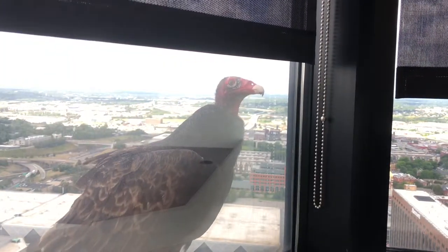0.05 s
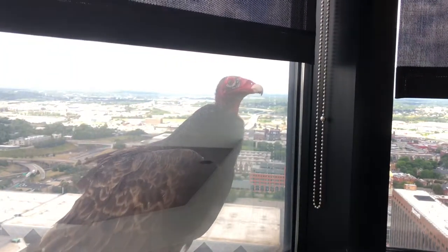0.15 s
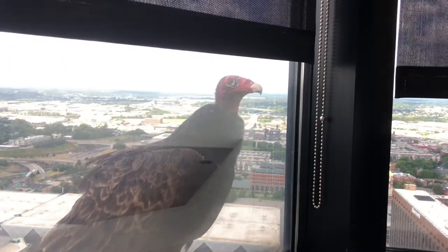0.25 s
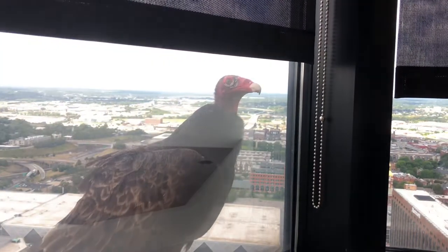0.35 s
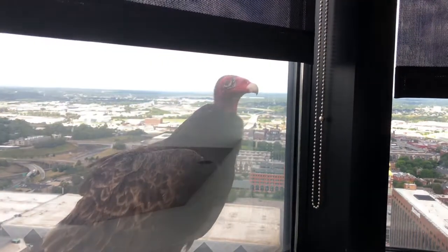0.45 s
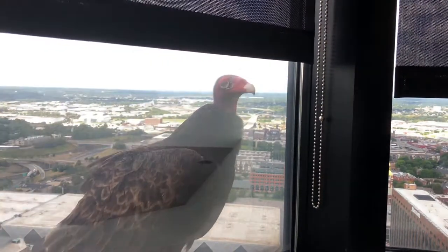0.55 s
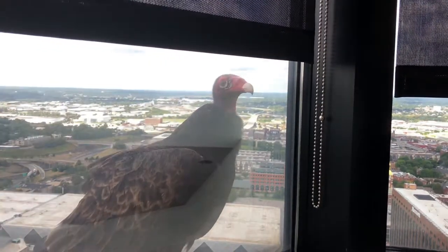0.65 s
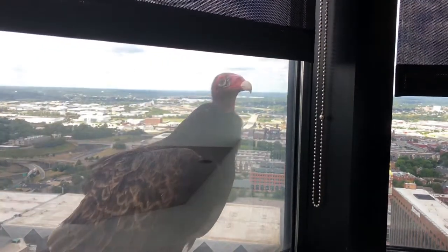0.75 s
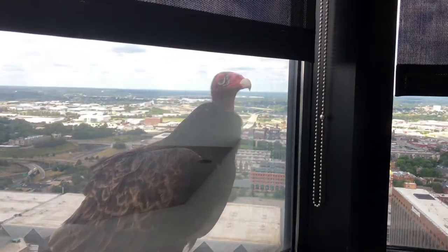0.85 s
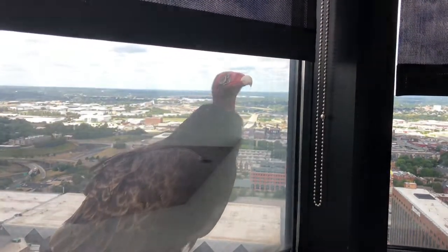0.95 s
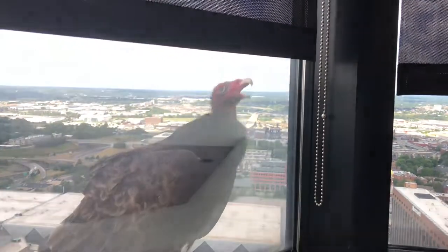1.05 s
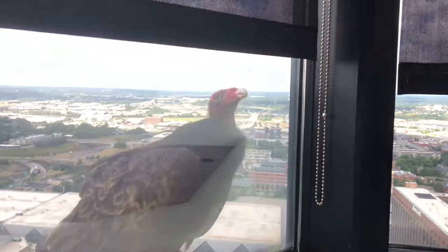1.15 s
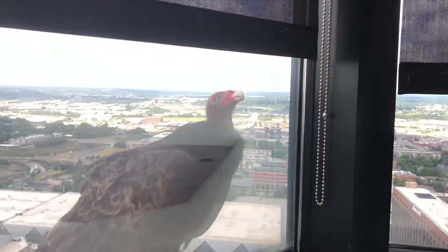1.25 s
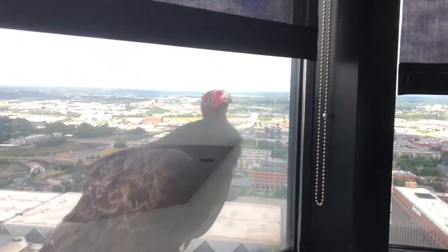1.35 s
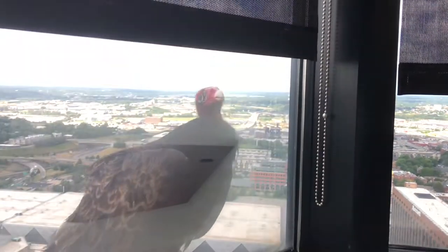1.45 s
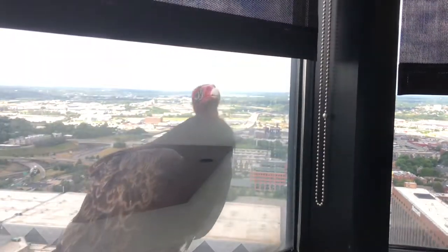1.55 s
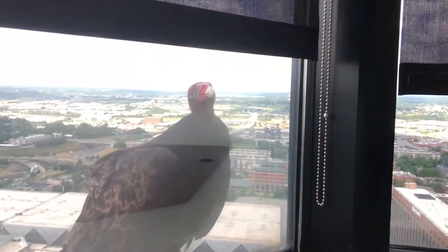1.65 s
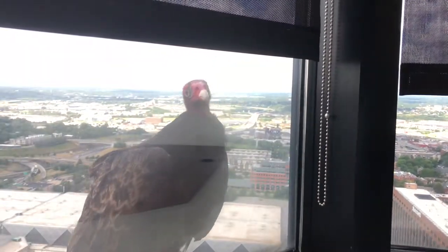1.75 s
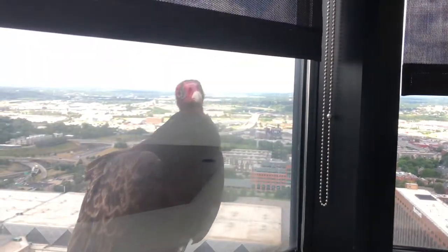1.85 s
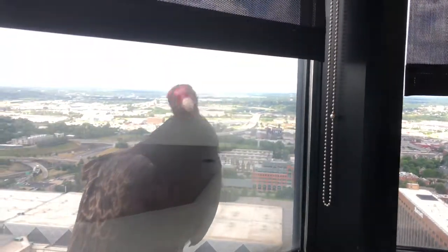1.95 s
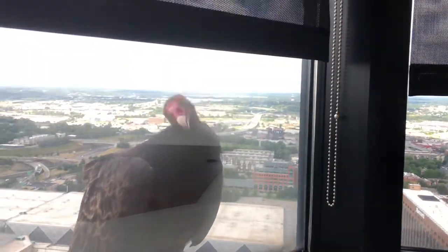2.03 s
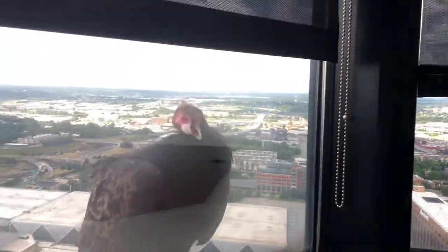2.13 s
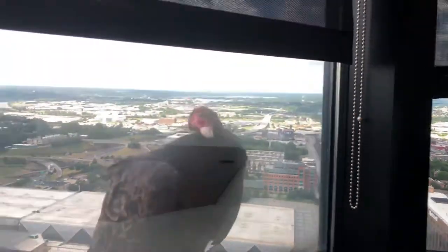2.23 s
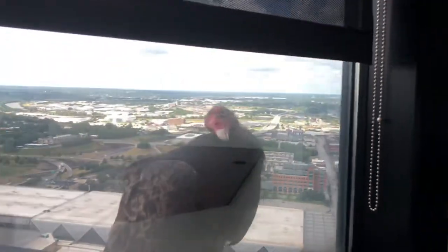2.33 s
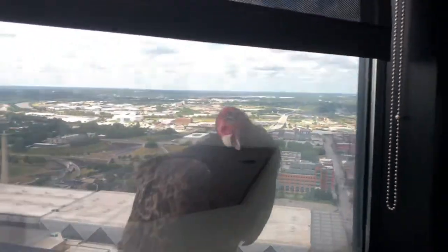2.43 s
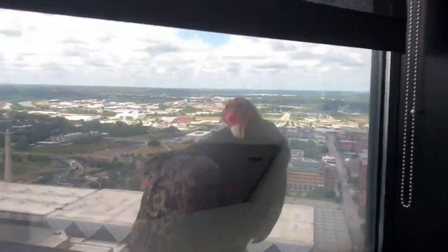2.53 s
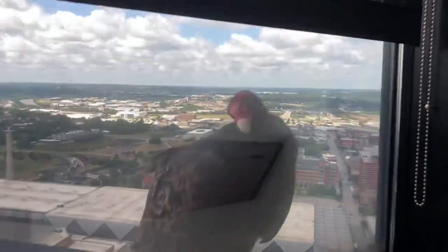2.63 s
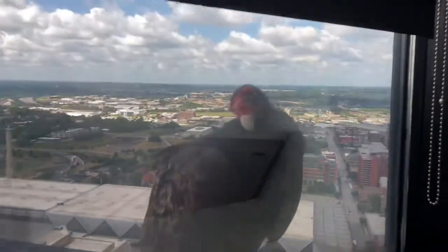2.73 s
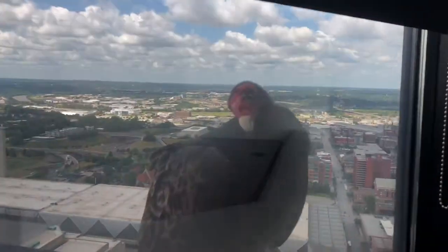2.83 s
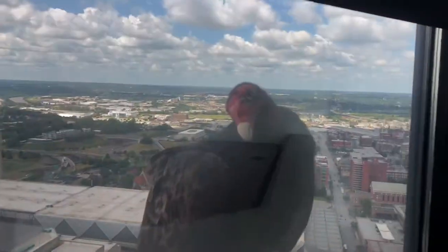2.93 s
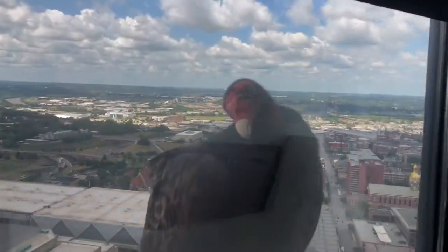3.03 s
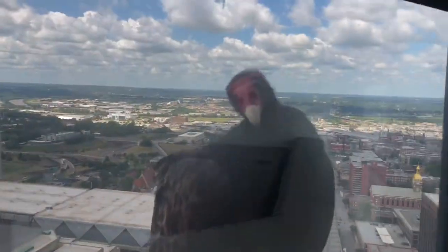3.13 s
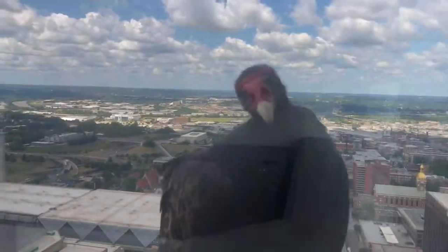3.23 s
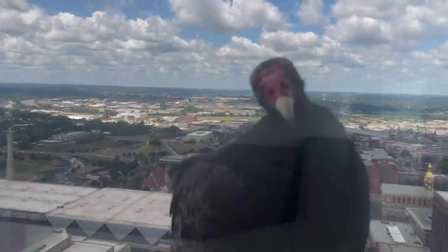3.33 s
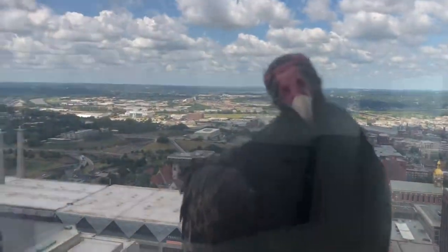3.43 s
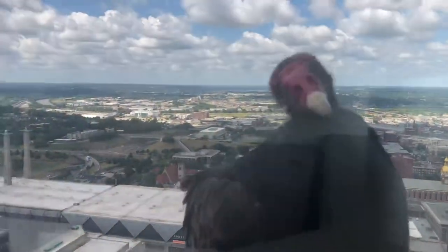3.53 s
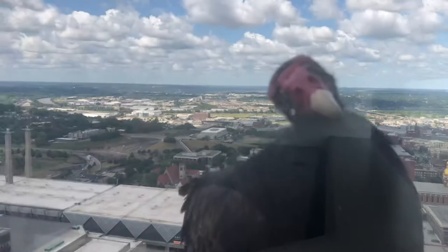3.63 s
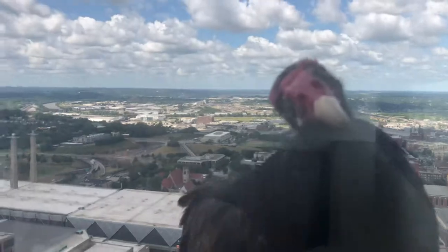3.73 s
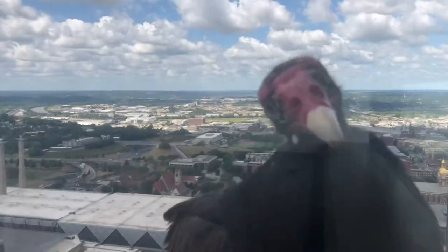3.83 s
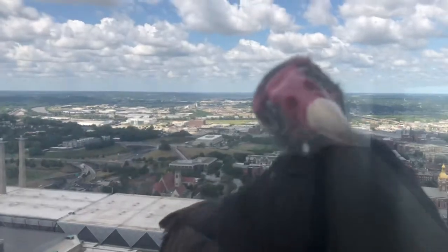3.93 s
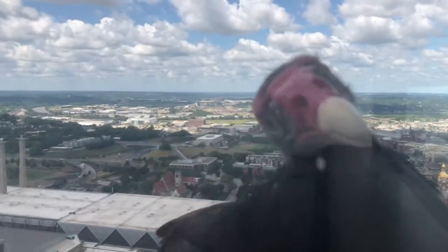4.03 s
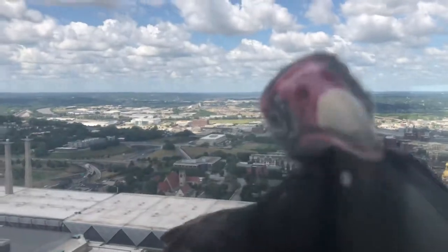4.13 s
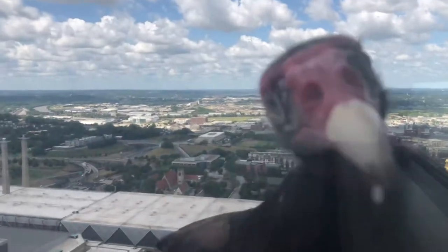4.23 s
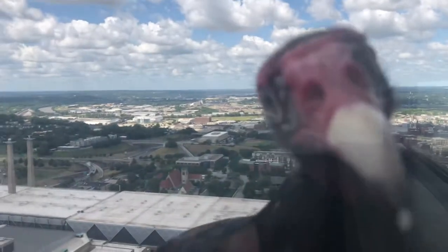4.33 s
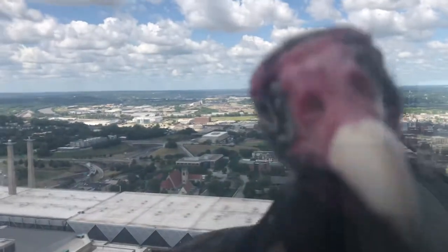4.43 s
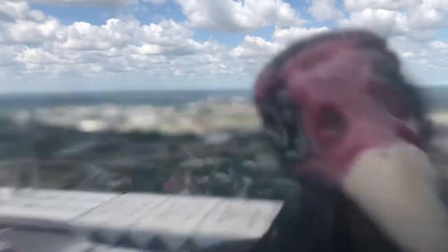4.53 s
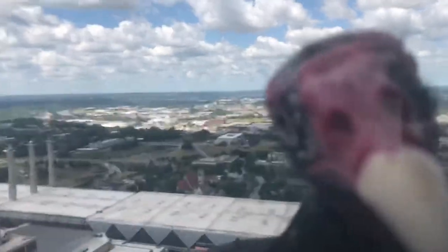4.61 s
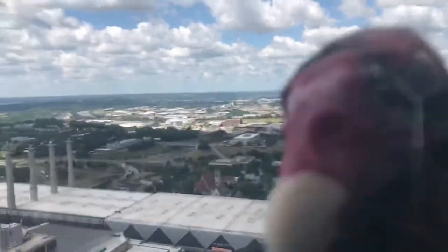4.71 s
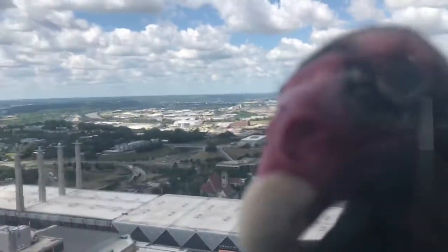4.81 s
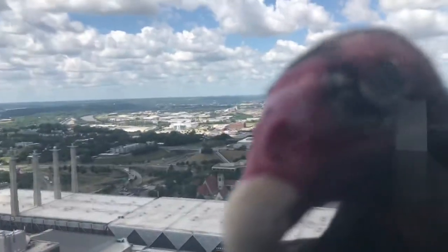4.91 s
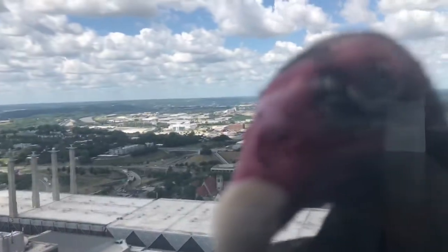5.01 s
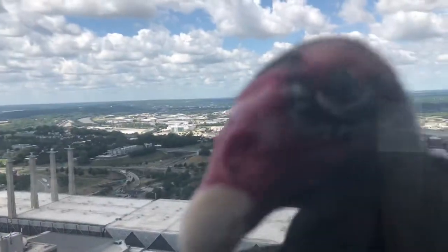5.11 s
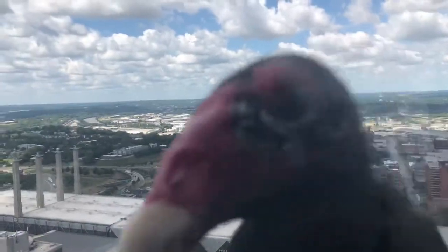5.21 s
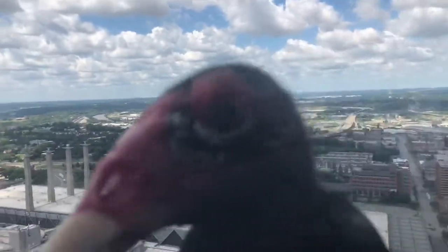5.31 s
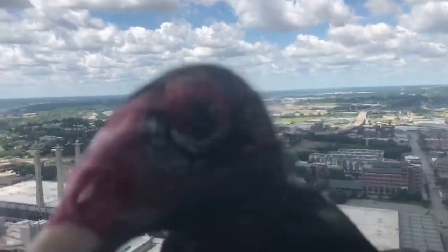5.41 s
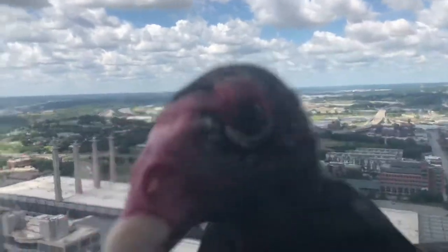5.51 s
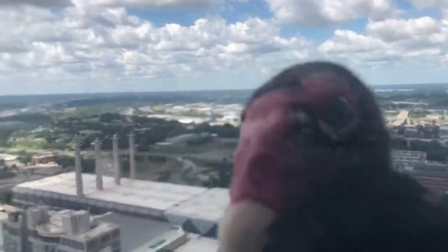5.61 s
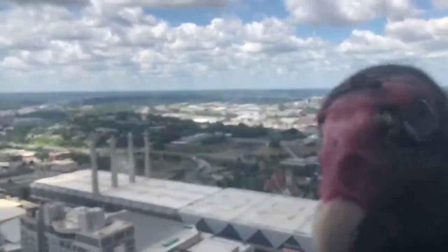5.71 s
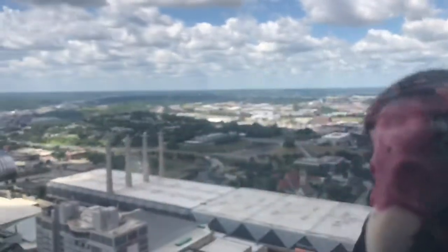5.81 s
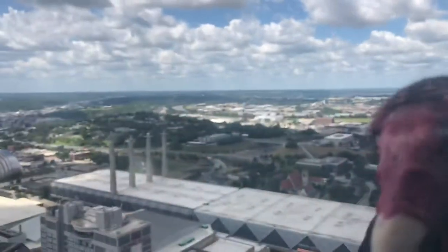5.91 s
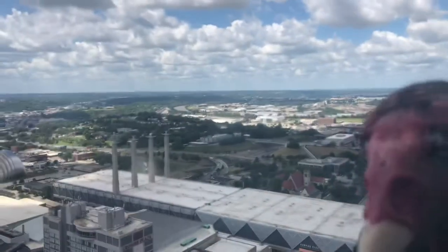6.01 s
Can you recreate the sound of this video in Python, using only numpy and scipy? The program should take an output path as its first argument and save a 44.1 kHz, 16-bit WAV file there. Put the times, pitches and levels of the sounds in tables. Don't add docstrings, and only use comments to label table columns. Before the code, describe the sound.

A low, soft ventilation rumble fills a room, with airy noise, a faint wavering fan hum near 138 Hz and a barely audible lens-drive hiss switching on and off. At 1.1 s come two or three quick, dull beak blows through the window frame. From 1.8 s small taps gather, with clearer ones near 2.1, 2.35 and 2.5 s, a gritty claw or feather drag, and short room echoes. Around 3 s there is a scratch and faint squeak, then light irregular pecks until 4.2 s as the microphone nears the pane and the air grows fuller. A sharper tap with a rising squeak at 4.46 s leads to a huge knock at 4.62 s: a bright crack dropping instantly to a thump, overloaded, with a tiny rattle. The background dips briefly. A weaker knock follows at 4.75 s, small taps and scrapes at 4.95 and 5.4 s, and a last faint tap at 5.8 s; the hum continues to 6 s.

```python
import sys
import numpy as np
from scipy import signal
from scipy.fft import rfft, irfft
from scipy.io import wavfile
from scipy.ndimage import uniform_filter1d

SR = 44100
rng = np.random.default_rng(int(sys.argv[2]) if len(sys.argv) > 2 else 0)


def boost(x):
    u = np.asarray(x, float) / 20
    return 10 ** u


def output_pcm(signal):
    pcm = np.clip(np.atleast_2d(signal).T, -1, 1) * 32767
    wavfile.write(sys.argv[1], SR, np.round(pcm).astype(np.int16))


N = 267246

# t/s, nearness/1, fan tone level/dB
WALK = [
    (0, 0.18, -58),
    (1.9, 0.25, -53.5),
    (2.8, 0.54, -50.5),
    (3.8, 0.87, -55.5),
    (4.2, 0.8, -45),
    (4.8, 0.97, -49.5),
    (5.0, 0.87, -65),
    (5.2, 0.9, -43),
    (5.6, .8, -45.5),
    (6.06, .8, -48.5),
]
# f/Hz, density level/dB
RUMBLE_SPECTRUM = [(15, -58), (25, -34.5), (60, -16), (120, -10.5), (200, -14), (300, -18), (600, -26),
                   (1000, -40.5)]
# f/Hz, density level/dB
AIR_SPECTRUM = [(25, -28.5), (256, -11), (451, -18.5), (560, -26), (988, -35), (2280, -50), (2760, -56),
                (16000, -72.5)]
# f/Hz, width/Hz, level/dB
ROOM_MODES = [(85, 11, -2), (182.7, 17, 5.5), (207, 11, 5), (236.5, 7.5, 2), (292, 7.5, 4.5), (361, 5.7, 0),
              (454, 3.4, 0.5), (565, 20, -2)]
# f/Hz, level/dB
WHINE = (15240, -91)
# on t/s, off t/s
DRIVE_RUNS = [(0.073, 0.914), (1.783, 2.009), (2.017, 2.812), (2.985, 3.063), (3.318, 3.385),
              (3.455, 3.599), (3.69, 3.76), (3.815, 3.96), (4.09, 4.172), (4.204, 4.435), (4.51, 4.596),
              (4.956, 4.995), (5.061, 5.247), (5.419, 5.694), (6.035, 6.101)]
# f/Hz, density level/dB
DRIVE_SPECTRUM = [(880, -36.5), (1500, -2), (2060, -4), (3730, -3), (5380, -5), (15100, -11.5),
                  (16000, -11.5)]
# t/s, peak level/dB, ring f/Hz, relative thud level/dB
DULL_BLOWS = [(1.094, -35.5, 1250, 11), (1.134, -43.5, 905, 10.5), (1.164, -57.5, 926, 27.5),
              (1.839, -57, 840, 13.5), (1.988, -50.5, 950, 11.5), (2.121, -37.5, 1790, 9.5),
              (2.957, -41.5, 1460, 2.5), (3.346, -52, 830, 9.5), (4.46, -34, 1280, -4),
              (4.919, -43.5, 1420, 7.3), (5.386, -51.5, 1390, 10.5), (5.804, -58, 802, 6)]
# t/s, peak level/dB, ring f/Hz, relative thud level/dB
CRISP_TAPS = [(2.533, -33, 2160, 6.5), (3.096, -55.5, 860, -2), (3.467, -46.5, 790, 4),
              (3.542, -47, 1060, -23), (3.626, -44, 2160, 10), (5.424, -44.5, 1550, -7)]
# t/s, peak level/dB, ring f/Hz, relative thud level/dB, relative tick level/dB
CLOSE_TAPS = [(2.25, -44.5, 850, 10.5, -10), (2.307, -45.5, 1280, 7.5, -4), (2.359, -33, 1500, -9.5, -13),
              (3.01, -46, 1480, -32, -5), (3.375, -47, 940, 4, -2.5), (3.687, -45, 1560, 8.5, 9.5),
              (3.813, -36, 1790, 7.5, 3), (3.938, -45.5, 2340, 9, -6.5), (4.118, -41.5, 800, 10.5, 2),
              (4.206, -57.5, 2370, 0, 14.5), (4.514, -44, 2367, -6.5, -3), (4.592, -35, 800, 11, -6),
              (4.6166, -15, 748, 2.2, -2.5), (4.7506, -27, 937, 1, -0.5), (4.955, -42, 1570, -2, -11)]
# f/Hz, width/Hz, level/dB (not used)
PANE_MODES = [(389, 16, 0), (705, 27, -1), (1280, 25, -13), (1570, 11, -11), (1690, 15, -13),
              (2230, 120, -15), (2390, 47, -15), (2750, 28, -17), (3060, 38, -17), (4360, 72, -18),
              (5340, 26, -18), (5200, 22, -19)]
# t/s, level/dB, f/Hz, length/s
RINGS = [(1.827, -69, 800, 0.026), (1.981, -60, 1080, .05), (2.352, -58, 1660, .04),
         (2.533, -47, 2000, 0.012), (3.341, -59.5, 870, 0.026), (3.529, -64, 1090, 0.013),
         (3.62, -75, 2330, .02), (3.818, -47.5, 763, 0.033), (3.94, -83, 2400, .03),
         (4.205, -67, 2450, 0.038), (4.468, -63, 3270, 0.026), (4.511, -61, 2460, 0.044),
         (4.663, -48, 4776, .015), (4.771, -46.5, 4940, 0.0068), (5.12, -39.5, 203, 0.0047),
         (5.851, -62.5, 451, 0.15)]
# t/s, level/dB, first f/Hz
SLIPS = [
    (2.958, -68, 1300),
    (4.4575, -50.5, 1280),
    (4.917, -52.5, 1264),
    (5.384, -61.5, 1300),
]
# start t/s, loudest t/s, end t/s, level/dB
SCRAPES = [
    (2.122, 2.37, 2.46, -59),
    (2.983, 3.028, 2.97, -50),
    (3.333, 3.387, 3.46, -57),
    (4.941, 4.97, 5.05, -53.5),
    (5.405, 5.427, 5.76, -67.5),
]
# t/s, level/dB, length/s
RATTLE = [
    (4.6214, -7, .00045),
    (4.6297, -17, .0009),
    (4.6399, -21, .0006),
    (4.6511, -32, .0005),
]
# f/Hz, density level/dB
RATTLE_SPECTRUM = [(500, -20), (2500, -12), (6000, -5), (8500, -11), (12000, -4), (14800, 0), (16300, -4),
                   (17000, -28)]

RUMBLE_DB, AIR_DB, DRAUGHT_DB, SELF_NOISE_DB = -52.5, -67, -87.5, -77.5
RUMBLE_GAIN_DB, AIR_GAIN_DB, DRAUGHT_GAIN_DB = 4, 4.5, 20
FAN_HZ = 138.3
BUSY_S, BUSY_SPAN_S, BUSY_DB = 3.7, 0.98, 9
DRIVE_DB = -65
DULL_TICK_DB, CRISP_TICK_DB = -31.5, -11
DULL_T60_S, CRISP_T60_S, CLOSE_T60_S = 0.34, 0.32, 0.34
BODY_RISE_S = .0018
RING_SAG, RING_T60_S = .95, .16
SLIP_S, SLIP_RISE, SLIP_T60_S = .04, 1.3, 0.12
SHEEN_DB, SHEEN_T60_S = -12.5, 0.17
SHEEN_SLOPE = 0.8
KNOCK_S = 4.61594
CRACK_HZ, SLIDE_MS, GLASS_HZ, CRACK_DB, HOLD_MS = 3150, .39, 575, 1.2, 3.2
THUMP_HZ, SAG_MS, THUMP_DB, THUMP_LAG_MS, THUMP_FADE_MS = 375, 9.5, -5.7, 1.52, 8.1
EDGE_HZ = 15790


def evened(x):
    return x / np.sqrt(np.mean(x ** 2) + 1e-20)


def add(mix, s, sound):
    part = mix[round(s * SR):][:len(sound)]
    part += sound[:len(part)]


def coloured(points, size, lo_hz=0, hi_hz=30000):
    hz = np.fft.rfftfreq(size, 1 / SR) + 1
    f, db = np.transpose(points)
    edges = 1 / (1 + (lo_hz / hz) ** 4) / (1 + (hz / hi_hz) ** 4)
    shape = boost(np.interp(np.log(hz), np.log(f), db))
    white = rfft(rng.standard_normal(size))
    return evened(irfft(white * edges * shape, size))


def resonate(x, hz, width):
    turn = np.exp(2j * np.pi * np.cumsum(hz * np.ones(len(x))) / SR)
    r = np.exp(-np.pi * width / SR)
    return 2 * (turn * signal.lfilter([1 - r], [1, -r], x / turn)).real


def standing(x):
    return x + sum(boost(db) * resonate(x, hz, width) for hz, width, db in ROOM_MODES)


def room():
    s, *columns = np.transpose(WALK)
    t = np.arange(N) / SR
    near, fan_db = (np.interp(t, s, c) for c in columns)
    rumble = boost(RUMBLE_DB + RUMBLE_GAIN_DB * near) * evened(standing(coloured(RUMBLE_SPECTRUM, N, hi_hz=520)))
    air = boost(AIR_DB + AIR_GAIN_DB * near) * coloured(AIR_SPECTRUM, N, lo_hz=550, hi_hz=3200)
    draught_spectrum = [(1200, -17), (1900, -3.5), (2600, -3.5), (2800, -13.5), (4000, -33)]
    draught = boost(DRAUGHT_DB + DRAUGHT_GAIN_DB * near) * coloured(draught_spectrum, N)
    smooth = uniform_filter1d(rng.standard_normal(N), size=9000)
    waver = evened(uniform_filter1d(smooth, size=9000))
    fan = boost(fan_db) * np.sin(2 * np.pi * np.cumsum(FAN_HZ + .35 * waver) / SR)
    whine_hz, whine_db = WHINE
    whine = boost(whine_db) * evened(resonate(rng.standard_normal(N), whine_hz, 21))
    busy = np.exp(-((t - BUSY_S) / BUSY_SPAN_S) ** 2)
    self_noise = boost(SELF_NOISE_DB + BUSY_DB * busy) * coloured(AIR_SPECTRUM, N, lo_hz=2963)
    return rumble + air + draught + fan + whine + self_noise


def drive():
    level = np.zeros(N)
    for on, off in DRIVE_RUNS:
        level[round(on * SR):round(off * SR)] = boost(DRIVE_DB)
    return uniform_filter1d(level, size=90) * coloured(DRIVE_SPECTRUM, N)


def tap(db, hz, thud_db, tick_db, t60):
    t = np.arange(SR // 2) / SR
    n = len(t)

    def fade(t60, rise):
        return boost(-60 * t / t60) * (1 - np.exp(-t / rise))

    ring = evened(resonate(resonate(rng.standard_normal(n), hz, .3 * hz), hz, .6 * hz))
    heavy_db = .7 * min(thud_db, 3)
    body = boost(heavy_db + 1) * coloured(
        [(400, -17), (900, 4), (2000, -1.5), (3000, -16), (4200, -34), (8000, -55.5)], n)
    bite = boost(heavy_db - 8.5) * coloured([(900, -17), (2000, -0.5), (3200, 0.0), (4200, -17), (8000, -43.5)], n)
    thud = boost(thud_db) * coloured([(90, -15.5), (220, 2.5), (600, 0.5), (1000, -10), (2000, -68)], n)
    tick = boost(tick_db) * coloured([(1500, -2.5), (4000, 6.5), (6000, -0.5), (9000, -22.5)], n)
    click = boost(heavy_db - 3.0) * coloured(
        [(900, -21), (2000, 4), (3300, -7.5), (4500, -0.5), (6000, -17.5), (8000, -29.5)], n)
    lumps = boost(1.8 * evened(uniform_filter1d(rng.standard_normal(n), size=200)))
    direct = 1 + 1.0 * np.exp(-t / 0.016)
    mix = (ring + body) * fade(1.03 * t60, BODY_RISE_S)
    mix += thud * fade(1.62 * t60, 0.013)
    mix += tick * fade(1.2 * t60, 0.0005)
    mix += bite * fade(.6 * t60, 0.0005)
    mix += click * fade(.015, 0.0002)
    return boost(db - 16.0) * mix * direct * lumps


def squeak(db, first_hz, last_hz, length, t60):
    t = np.arange(SR // 3) / SR
    hz = first_hz + (last_hz - first_hz) * np.minimum(t / length, 1)
    narrow = resonate(rng.standard_normal(len(t)), hz, .15 * first_hz)
    whistle = evened(resonate(narrow, hz, .3 * first_hz))
    decay = boost(db - 60 * np.maximum(t - length, 0) / t60)
    direct = 1 + 1.3 * np.exp(-t / 0.021)
    return decay * whistle * (1 - np.exp(-t / 0.0007)) * direct


def scrapes():
    t = np.arange(N) / SR
    level = np.zeros(N)
    for start, loudest, end, db in SCRAPES:
        level += boost(np.interp(t, [start, loudest, end], [db - 12, db, db - 13.0], -200, -200))
    grain = boost(2.6 * evened(uniform_filter1d(rng.standard_normal(N), size=120)))
    hiss = coloured([(1200, -12), (3000, -1), (4500, -1), (6000, -7.5), (9000, -27), (15000, -42)], N)
    return level * grain * hiss


def sheen(db, t60):
    t = np.arange(SR // 3) / SR
    envelope = boost(db - 11.5 - 60 * t / t60) * (1 - np.exp(-t / .001))
    return envelope * coloured([(4000, -21.0), (7500, 3.0), (15000, -6.5)], len(t))


def knock():
    t = np.arange(SR // 25) / SR
    ms = 1000 * t

    def swing(hz):
        return np.sin(2 * np.pi * np.cumsum(hz) / SR)

    crack = swing(GLASS_HZ + CRACK_HZ * np.exp(-ms / SLIDE_MS))
    crack = crack * (1 - np.exp(-ms / .05)) / (1 + (ms / HOLD_MS) ** 6)
    thump = swing(THUMP_HZ * (1 + ms / SAG_MS) ** -1.5)
    thump = thump * (1 - np.exp(-ms / .7)) * np.exp(-ms / THUMP_FADE_MS)
    out = np.zeros(N)
    add(out, KNOCK_S, boost(CRACK_DB) * crack)
    add(out, KNOCK_S + THUMP_LAG_MS / 1000, -boost(THUMP_DB) * thump)
    out = 1.4 * np.tanh(out / 1.4)
    for s, db, length in RATTLE:
        bounce = t / length * np.exp(1 - t / length * 2)
        add(out, s, boost(db) * coloured(RATTLE_SPECTRUM, len(t)) * bounce)
    return out


def scene():
    beak = np.zeros(N)
    for s, *row in DULL_BLOWS:
        add(beak, s, tap(*row, DULL_TICK_DB, DULL_T60_S))
    for s, *row in CRISP_TAPS:
        add(beak, s, tap(*row, CRISP_TICK_DB, CRISP_T60_S))
    for s, *row in CLOSE_TAPS:
        add(beak, s, tap(*row, CLOSE_T60_S))
    pane = sum(resonate(beak, hz, .4 * width) * 1 for hz, width, db in PANE_MODES)
    beak = standing(beak) + pane + scrapes()
    for s, db, hz in SLIPS:
        add(beak, s, squeak(db, hz, hz * SLIP_RISE, SLIP_S, SLIP_T60_S))
    for s, db, hz, length in RINGS:
        add(beak, s, squeak(db, hz, hz * RING_SAG, length, RING_T60_S))
    for s, db, hz, thud_db, tick_db in CLOSE_TAPS:
        add(beak, s, sheen(SHEEN_SLOPE * (db + tick_db) + SHEEN_DB, SHEEN_T60_S))
    after = np.arange(N) / SR - KNOCK_S
    release = np.exp(-(np.maximum(after, 0) / 0.025) ** 2)
    duck = boost(-16 * (after > 0) * release)
    edge = signal.firwin(511, EDGE_HZ, window=("kaiser", 8), fs=SR)
    banded = signal.oaconvolve((room() + drive() + beak) * duck, edge, "same")
    return (banded + knock())[None]


def top_cut(x):
    return signal.sosfilt(signal.butter(12, 17140, fs=SR, output="sos"), x)


def record(dry):
    return top_cut(np.clip(dry, -.997, .997))


dry = scene()
out = record(dry)
output_pcm(out)
```